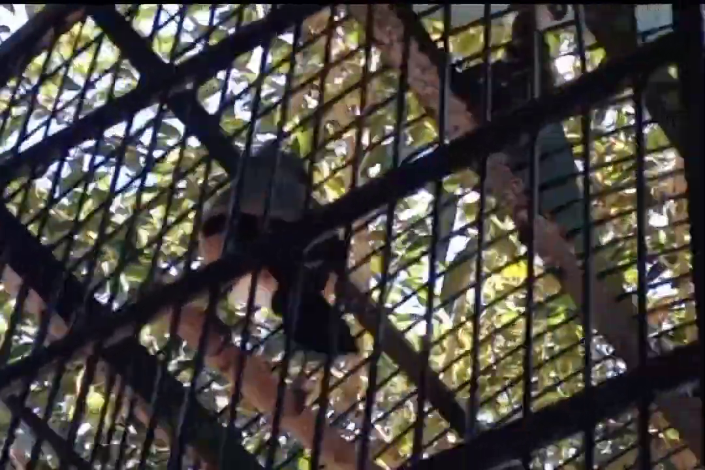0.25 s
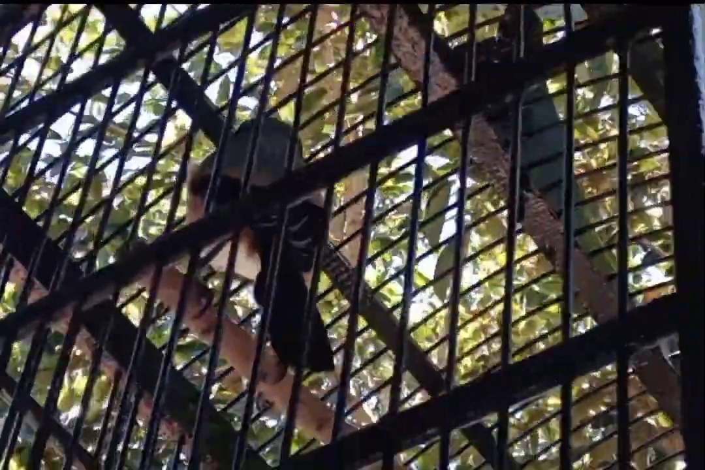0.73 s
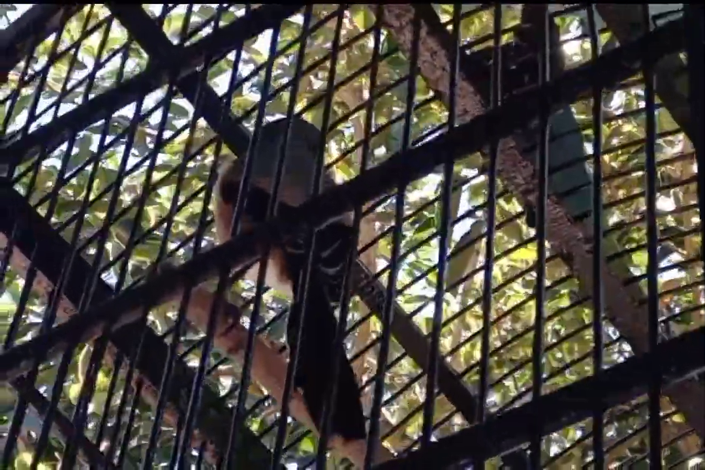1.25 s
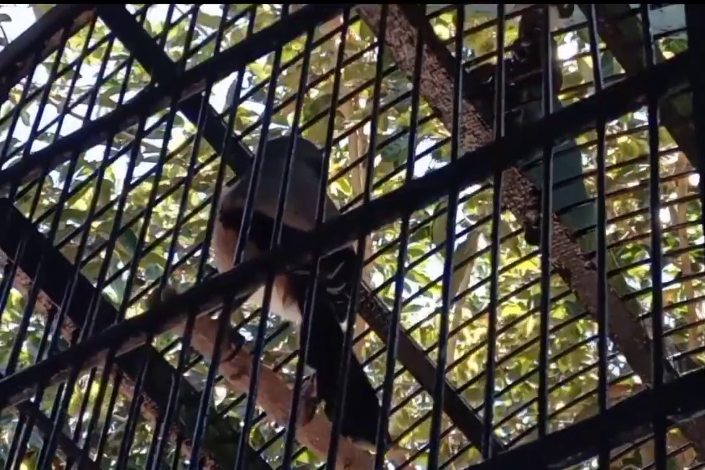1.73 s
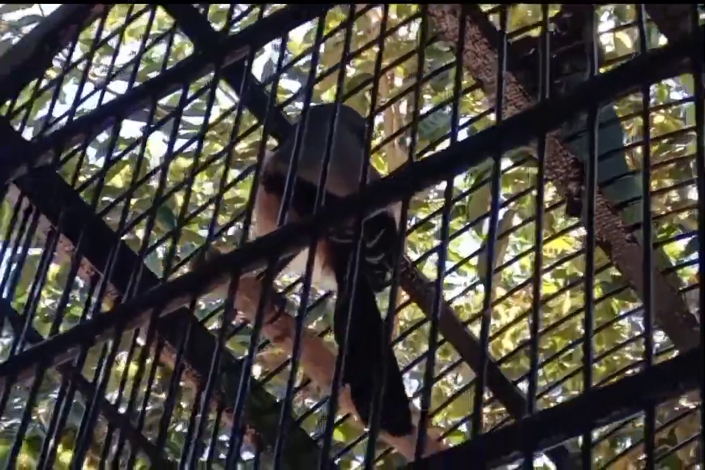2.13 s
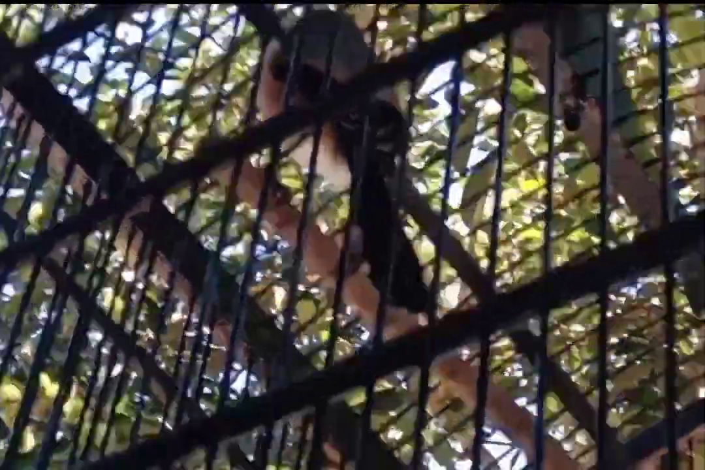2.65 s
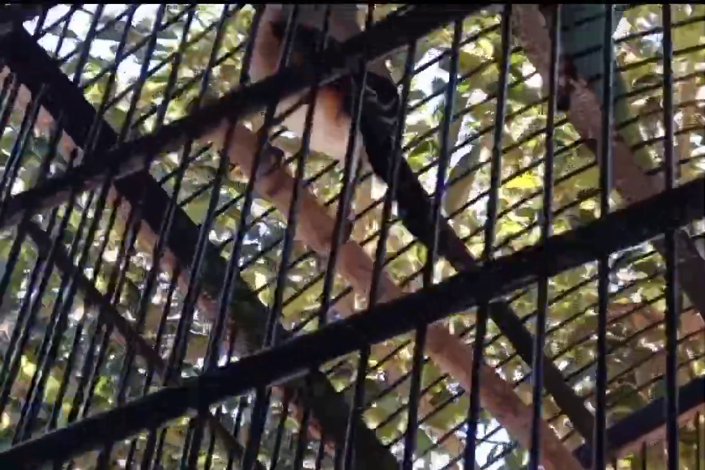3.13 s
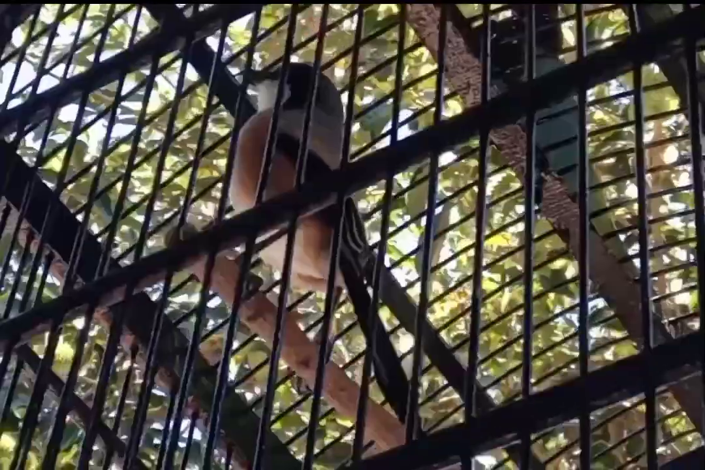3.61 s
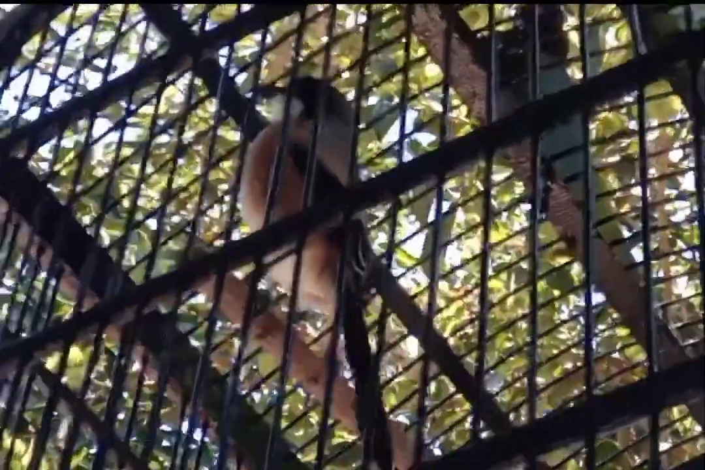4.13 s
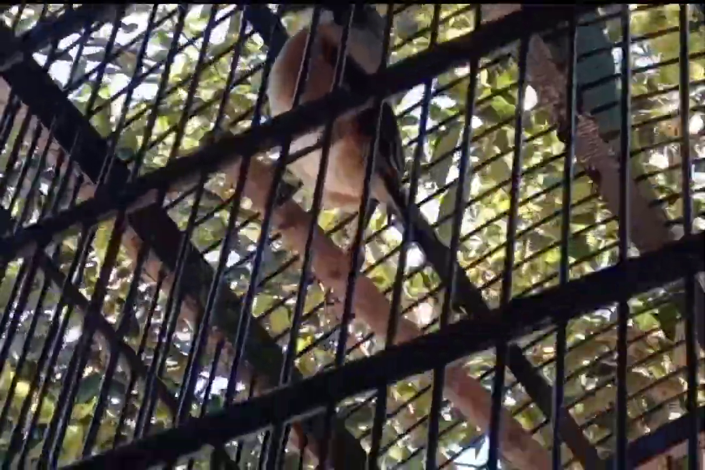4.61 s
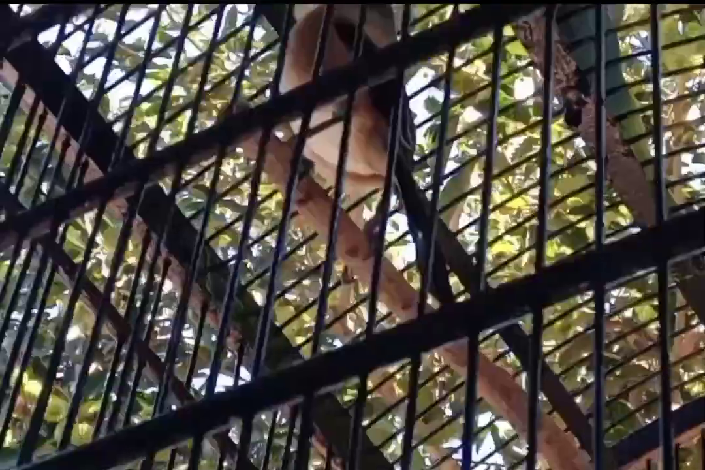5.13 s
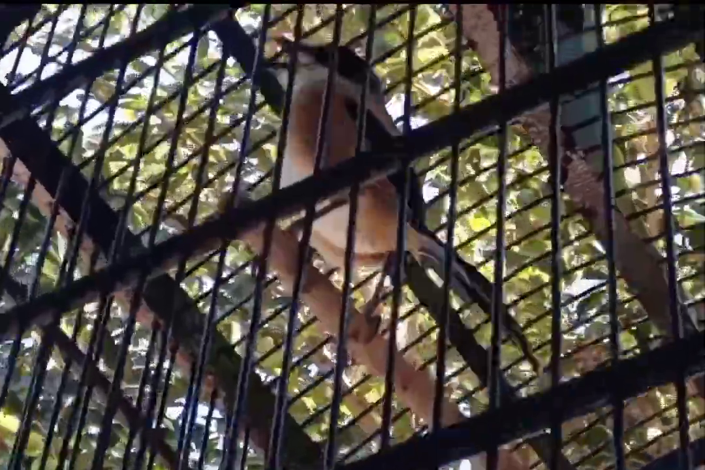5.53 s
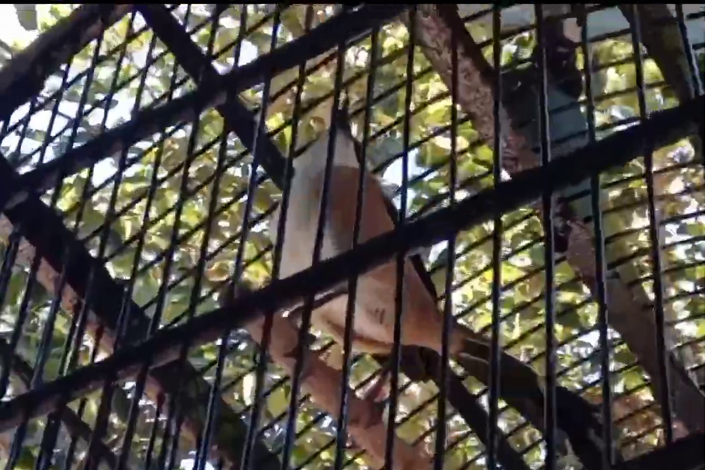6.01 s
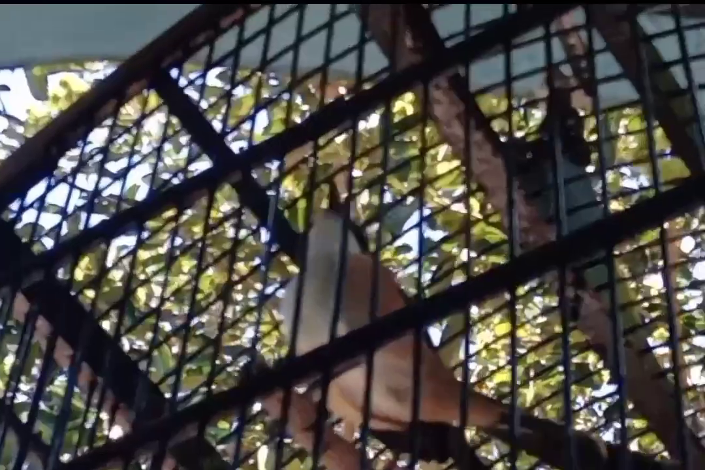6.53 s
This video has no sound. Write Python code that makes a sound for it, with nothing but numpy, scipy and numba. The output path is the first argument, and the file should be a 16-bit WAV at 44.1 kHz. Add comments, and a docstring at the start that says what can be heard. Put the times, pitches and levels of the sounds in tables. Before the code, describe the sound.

Outdoors in a walled yard, a caged bird sings close to a phone microphone, with a low single-cylinder motorbike idling at about 12 to 16 putts a second and soft street hiss. The tail of a rasp opens, then three rising double chirps at 0.15-0.4 s and falling whistles at 0.5 and 0.9. A harsh throbbing rasp lasts from 1.2 to 1.4, three chirps follow at 1.5-1.7, whistles at 1.9 and 2.7, with one faint chirp at 2.4. Rasp at 3.0, chirps at 3.3-3.55, whistle at 3.7, weak chirp at 4.0, rasp at 4.25. The engine stops at 4.3. Chirps at 4.5-4.7, whistles at 4.8 and 5.15; wood knocks between 5.1 and 5.65 overlap a rasp at 5.5. Two chirps at 5.75-5.9, wing swishes near 6.0-6.5, a strong whistle at 6.1, and broken short rasps from 6.5 to 6.7.

```python
"""A caged shrike sings close to a phone in a walled yard: harsh rasps of throbbing pulses and breath,
double rising chirps of two coupled voices, and falling whistles built from gliding sines.
A single-cylinder motorbike idles nearby as a train of ringing firings, then stops. Struck modes make wood
knocks, filtered noise makes wing swishes and street hiss, and faint gliding sines make the far calls.
The phone turns its gain down under the loud rasps and limits the peaks."""
import sys
import numpy as np
from scipy import signal
from scipy.fft import rfft, irfft, next_fast_len
from scipy.io import wavfile
from scipy.ndimage import uniform_filter1d, minimum_filter1d
from numba import njit

SR = 44100
rng = np.random.default_rng(int(sys.argv[2]) if len(sys.argv) > 2 else 0)


def gain_from_db(level_db):
    """Turn a decibel level (scalar or array-like) into a linear amplitude factor."""
    decades = np.asarray(level_db, float) / 20
    return 10 ** decades


def generate_wav(signal):
    """Clip the signal to [-1, 1] and save it as 16-bit WAV at the path in sys.argv[1]."""
    frames = np.transpose(np.atleast_2d(signal))
    scaled = np.clip(frames, -1, 1) * 32767
    pcm = np.round(scaled).astype(np.int16)
    wavfile.write(sys.argv[1], SR, pcm)


N = 298116
T = np.arange(N) / SR

# Level of the street hiss: (time [s], level [dB])
STREET_LEVEL = [(0, -27.5), (1, -29.5), (4.1, -30.5), (4.6, -40.5), (6.3, -33), (6.76, -35.5)]
# Colour of the street hiss: (frequency [Hz], relative density [dB per Hz])
STREET_COLOUR = [(210, -10.5), (350, 4.5), (392, -9.5), (575, -4), (755, -1.5), (858, -5), (1280, -5.5),
                 (1460, -8.5), (1910, -4), (3300, -12.5), (6670, -8), (8910, -27.5), (16100, -35)]
# Edges between the street bands that waver separately: (frequency [Hz])
STREET_BAND_EDGES = [600, 1200, 2200, 3800, 6000, 9000]
# Level of the low rumble, before it wavers: (time [s], level [dB])
RUMBLE_LEVEL = [(4.4, -40), (5.0, -35.5), (5.4, -41), (6.1, -31), (6.76, -43.5)]
# Far birds and squeaks: (time [s], length [s], start pitch [Hz], end pitch [Hz], level before blurring [dB])
FAR_CALLS = [(.17, 0.19, 1510, 1425, -26.5), (1.958, 0.12, 442, 380, -18), (2.133, .045, 14500, 14200, -36),
             (2.48, 0.047, 14500, 14300, -36), (2.563, 0.089, 733, 676, -26.5),
             (3.961, 0.042, 11600, 11100, -30), (3.967, 0.079, 10430, 10530, -23),
             (4.069, 0.031, 6670, 5900, -17), (4.16, 0.097, 1320, 1245, -31), (4.512, 0.21, 310, 310, -32),
             (6.061, 0.055, 7430, 7300, -11), (6.248, 0.29, 1276, 1220, -25)]
# Near surfaces of the yard: (delay [ms], level against the direct sound [dB])
NEAR_ECHOES = [(3.66, -3.5), (9.0, -13), (15.0, -24)]
# Scattered tail of the walls, by band: (centre [Hz], relative level [dB], decay by 60 dB [s])
WALL_BANDS = [(603, 17, 0.076), (1550, -2.5, 0.12), (2147, 7.5, 0.1), (2900, 4.5, 0.2), (4300, -10, 0.53),
              (7740, -4.5, 0.37), (10800, -6, 0.076)]
# Idling speed of the motorbike: (time [s], firing rate [firings per s])
IDLE_SPEED = [(0, 15.45), (.28, 16.22), (.88, 12.1), (1.13, 12.35), (1.48, 14.08), (2.28, 15.81),
              (2.78, 15.75), (3.28, 14.62), (3.88, 15.62), (4.18, 11.52)]
# Exhaust modes: (frequency [Hz], relative level [dB], decay by 60 dB [s])
EXHAUST_MODES = [(82.8, 4, 0.38), (128.7, 6.5, 0.16), (201.2, 1, 0.22), (309.3, -13, 1), (740.7, -12, 0.25)]
# Swishes of wings: (time [s], length [s], low air level [dB], feather hiss level [dB])
WING_SWISHES = [(1.122, 0.052, -62, -23.5), (2.072, 0.075, -35, -19), (5.995, 0.12, -26.5, -48),
                (6.036, 0.17, -30, -19), (6.269, 0.23, -24.5, -29.5)]
# Knocks on wood: (time [s], level [dB], hollow body against board [dB], crack against board [dB])
WOOD_KNOCKS = [(5.133, 7.5, -25, -8.5), (5.323, 5.5, -14, -9.5), (5.483, 18, -19.5, -7.5),
               (5.644, 11.5, -19, -13)]
# Modes of the struck board: (frequency [Hz], relative drive [dB], decay by 60 dB [s])
BOARD_MODES = [(739, -9, 0.021), (1082, -3.5, 0.049), (1578, -4, 0.12), (1936, 9, 0.039),
               (2130, -7.5, 0.13), (3260, -19, 0.068), (6600, -19, 0.034)]
# Modes of the hollow behind it: (frequency [Hz], relative drive [dB], decay by 60 dB [s])
HOLLOW_MODES = [(310, -3, 0.34), (378, 14, 0.059), (450, 29, 0.032), (820, -10, .08)]
# Rasps: (time [s], length [s], level before the throbs [dB], basic pulse rate [Hz],
#         throat brightness at start [dB per octave])
RASPS = [(-.05, .115, 8.5, 628, 1.5), (1.22, 0.21, 9.5, 601.2, 2.5), (3.036, 0.24, 7.5, 604, 4),
         (4.245, 0.2, 0, 571.3, 1.2), (5.47, .22, 9, 605.3, 3), (6.477, 0.01, 0.5, 883, -2),
         (6.492, .032, -4.5, 587, 0.5), (6.533, 0.035, -3, 395, -1), (6.636, 0.0073, 2.5, 900, 3.5),
         (6.642, 0.053, -1.5, 450, 3)]
# Throat colour before the brightness tilt: (frequency [Hz], relative density [dB per Hz])
THROAT_COLOUR = [(710, -90), (1200, -37.5), (1350, -57), (1660, -19), (1980, -30.5), (2210, -21.5),
                 (2620, -32.5), (3300, -12), (3950, -9.5), (5090, 0.5), (5990, -10), (7130, -7.5),
                 (8500, -29.5), (10500, -29.5), (13400, -44.5), (15100, -28.5), (16100, -38)]
# Falling whistles: (time [s], length [s], start pitch [Hz], end pitch [Hz], level [dB])
WHISTLES = [(0.492, 0.17, 2398, 1342, 1.5), (0.886, 0.16, 2304, 1300, 4.5), (1.927, 0.18, 2460, 1264, 3),
            (2.67, 0.16, 2358, 1242, 2), (3.712, 0.18, 2398, 1279, 4.5), (4.82, 0.16, 2440, 1235, 0.5),
            (5.164, 0.16, 2214, 1280, 2.5), (6.111, 0.17, 2453, 1292, 6.5)]
# Share of a whistle's drop reached after one and two thirds of its length: (share [0 to 1])
WHISTLE_FALL = [.27, .6]
# Multiples 2 to 8 of a whistle, before the treble colour: (level against the fundamental [dB])
WHISTLE_OVERTONES = [-18.5, -33, -39, -53, -47, -49, -48]
# Treble colour of the whistles: (frequency [Hz], relative gain [dB])
WHISTLE_TREBLE = [(3000, 3.7), (5200, -13), (6600, 8.5), (7600, -6), (8600, -32), (12500, -14), (14800, -4),
                  (16100, -7)]
# Double chirps, one voice from each side of the syrinx: (time [s], upper voice level [dB],
#         upper voice top pitch [Hz], lower voice lag [ms], lower voice level [dB])
CHIRPS = [(0.147, 5.5, 3380, 8.7, 2.5), (0.248, -1, 3160, 12, 1.5), (0.35, -6.5, 3150, 9, -0.5),
          (1.498, 3, 3180, 12, 4.5), (1.6, -0.5, 3190, 7.6, 2.5), (1.705, 1, 3080, 12.4, 3.5),
          (2.378, -12, 2900, 11, -2), (3.328, 4, 3330, 14.3, 3), (3.423, 0.5, 3170, 11.8, 3),
          (3.53, -1, 3260, 12, 2.5), (4.032, -6.5, 3060, 16, 1), (4.478, 2, 3135, 13, 0),
          (4.574, -3, 3190, 13.4, -1.5), (4.676, -2.5, 2900, 15.2, -5.5), (5.753, 5.5, 3420, 8.8, 1),
          (5.857, 4.5, 3507, 6.8, 2.5)]
# Square and cube of the two chirp voices together: (level [dB])
VOICE_COUPLING = [-13, -32.5]


def colour(x, points):
    """Filter by (frequency [Hz], gain [dB]) points, then bring the rms to 1."""
    hz, db = np.transpose(points)
    size = next_fast_len(N)
    bins_hz = np.arange(size // 2 + 1) * SR / size
    gain = gain_from_db(np.interp(np.log(bins_hz + 1), np.log(hz), db))
    y = irfft(rfft(x, size) * gain, size)[:N]
    return y / np.std(y)


def curve(points):
    """Rows (time [s], value) joined by straight lines."""
    return np.interp(T, *np.transpose(points))


def walk(rate):
    """Random levels held 1 / rate s and slewed twice; spread near 1."""
    hold = int(SR / rate)
    steps = np.repeat(rng.standard_normal(N // hold + 1), hold)
    return 1.3 * uniform_filter1d(uniform_filter1d(steps, hold), hold)[:N]


def gate(start, length, rise, fall):
    """Smooth on and off of one sound, all in s."""
    opening = np.clip((T - start) / rise, 0, 1)
    closing = np.clip((start + length - T) / fall, 0, 1)
    return np.sin(np.pi / 2 * opening * closing) ** 2


def ring(x, modes):
    """Excite decaying resonances (frequency [Hz], drive [dB], decay by 60 dB [s])."""
    out = 0
    for hz, db, t60 in modes:
        pole = np.exp(2j * np.pi * hz / SR - np.log(1000) / (t60 * SR))
        out = out + gain_from_db(db) * signal.lfilter([1], [1, -pole], x).imag
    return out


def add_note(out, start, length, path_hz, db, rise, fall, overtones_db):
    """A sine with overtones, gliding smoothly through path_hz; rise and fall are shares of its length."""
    u = np.linspace(0, 1, int(length * SR))
    glide = np.polyfit(np.linspace(0, 1, len(path_hz)), path_hz, len(path_hz) - 1)
    phase = 2 * np.pi * (np.cumsum(np.polyval(glide, u)) / SR + rng.random())
    wave = np.sin(phase)
    for multiple, overtone_db in enumerate(overtones_db, 2):
        wave = wave + gain_from_db(overtone_db) * np.sin(multiple * phase)
    shape = np.sin(np.pi / 2 * np.clip(u / rise, 0, 1) * np.clip((1 - u) / fall, 0, 1)) ** 2
    i = int(start * SR)
    out[i:i + len(u)] += gain_from_db(db) * shape * wave


@njit
def follow(x, attack, release):
    """Envelope that rises fast and sinks slowly."""
    y, e = np.empty(len(x)), x[:400].mean()
    for i in range(len(x)):
        e += (x[i] - e) * (attack if x[i] > e else release)
        y[i] = e
    return y


def street():
    """Distant traffic and leaves as noise, each band wavering by itself, over a low rumble."""
    hiss = colour(rng.standard_normal(N), STREET_COLOUR)
    lows = [signal.sosfiltfilt(signal.butter(1, hz, fs=SR, output="sos"), hiss) for hz in STREET_BAND_EDGES]
    bands = np.diff([0 * hiss, *lows, hiss], axis=0)
    wavering = sum(gain_from_db(2.2 * walk(14)) * band for band in bands)
    rumble = colour(rng.standard_normal(N), [(40, -45), (90, -11), (200, -26), (400, -28.0), (800, -52)])
    return gain_from_db(curve(STREET_LEVEL)) * wavering + gain_from_db(curve(RUMBLE_LEVEL) + 2 * walk(12)) * rumble


def far_calls():
    """Gliding sines whose strength wanders, as distance blurs the calls."""
    calls = np.zeros(N)
    for start, length, start_hz, end_hz, db in FAR_CALLS:
        add_note(calls, start, length, [start_hz, end_hz], db, .2, .5, [])
    return calls * gain_from_db(5 * walk(60))


def yard(x):
    """A few near echoes comb the sound; the walls add scattered echoes, each band dying at its own pace."""
    tail_db = -5  # energy of the whole tail against the direct sound
    t = T[:SR // 2]
    centres_hz = np.transpose(WALL_BANDS)[0]
    scatter = rng.standard_normal(N) * gain_from_db(5.1 * rng.standard_normal(N))
    tail = np.zeros(len(t))
    for hz, db, t60 in WALL_BANDS:
        band = colour(scatter, np.c_[centres_hz, np.where(centres_hz == hz, 0, -30)])[:len(t)]
        tail += gain_from_db(db) * band * np.exp(-np.log(1000) * t / t60)
    tail = tail * np.clip(t / 0.0009, 0, 1)
    response = gain_from_db(tail_db) * tail / np.sqrt(np.sum(tail ** 2))
    response[0] = 1  # direct sound
    for ms, db in NEAR_ECHOES:
        # sinc places the echo between samples
        response += gain_from_db(db) * np.sinc(t * SR - ms * SR / 1000)
    return signal.fftconvolve(x, response)[:N]


def motorbike():
    """Each firing, uneven in strength, rings the exhaust modes until the valve shuts; then the engine stops."""
    idle_db, extra_db, extra_until_s, stops_s = -12, 3, 1, 4.3  # the idle starts louder
    count = 0.29 + np.cumsum(curve(IDLE_SPEED)) / SR  # starts partway through a cycle
    level_db = idle_db + extra_db * np.clip((extra_until_s - T) / 0.083, 0, 1)
    level_db = level_db + 2.0 * rng.standard_normal(N)
    firings = np.diff(np.floor(count), prepend=0) * gain_from_db(level_db) * (T < stops_s)
    t = T[:SR // 10]
    pipe = 0
    for hz, db, t60 in EXHAUST_MODES:
        pipe = pipe + gain_from_db(db) * np.exp(-np.log(1000) * t / t60) * np.sin(2 * np.pi * hz * t)
    # the valve swells the ring for 47 ms; a weaker ring remains
    pipe = pipe * (0.28 + gate(0, 0.0469, 0.0082, 0.0039)[:len(t)])
    return signal.fftconvolve(firings, pipe / np.abs(pipe).max())[:N]


def swishes():
    """Pushed air below, feather hiss above, both fluttering."""
    air = colour(rng.standard_normal(N), [(150, -11), (350, 1), (600, 0.5), (1200, -12.5),
                                          (2500, -8.5), (5000, -59.0)])
    hiss = colour(rng.standard_normal(N), [(1500, -24.5), (4000, -4.5), (7000, 5), (9000, -19.0),
                                           (12000, -17.5), (15000, -20.5), (16500, -22)])
    out = np.zeros(N)
    for start, length, air_db, hiss_db in WING_SWISHES:
        stroke = gate(start, length, 0.092 * length, .5 * length)
        out += stroke * (gain_from_db(air_db) * air + gain_from_db(hiss_db) * hiss)
    return out * gain_from_db(3 * walk(60))


def knocks():
    """A sharp blow rings the board and cracks; the hollow behind it answers a moment later."""
    out = np.zeros(N)
    hiss = colour(rng.standard_normal(N), [(600, -13.5), (1500, 5.0), (6000, -31.5), (10000, -1),
                                           (12800, -23), (15000, -2.5), (16500, -24.5)])
    for start, db, hollow_db, crack_db in WOOD_KNOCKS:
        blow = rng.standard_normal(N) * gate(start, 0.0019, 0.0014, 0.0046)
        board = np.gradient(ring(blow, BOARD_MODES))
        push = np.gradient(np.gradient(gate(start + .007, .003, .0015, .0015)))
        hollow = ring(push, HOLLOW_MODES)
        crack = hiss * (T > start) * np.exp(-np.abs(T - start) / 0.0054)
        knock = board / np.abs(board).max() + gain_from_db(hollow_db) * hollow / np.abs(hollow).max()
        out += gain_from_db(db) * (knock + gain_from_db(crack_db) * crack)
    return out


def notes():
    """Whistles that fade as they sink, and two-voiced chirps that rise fast, level off and intermodulate."""
    whistles, chirps = np.zeros((2, N))
    for start, length, start_hz, end_hz, db in WHISTLES:
        path_hz = [start_hz, *(start_hz + share * (end_hz - start_hz) for share in WHISTLE_FALL), end_hz]
        add_note(whistles, start, length, path_hz, db, .2, .45, WHISTLE_OVERTONES)
    whistles = np.std(whistles) * colour(whistles, WHISTLE_TREBLE)

    upper_hz, upper_s = 2195, 0.034  # start pitch and length of the upper voice
    lower_hz, lower_top_hz, lower_s = 1658, 2932, 0.038
    lower_path = [lower_hz, 0.46 * lower_hz + 0.54 * lower_top_hz,
                  0.051 * lower_hz + .92 * lower_top_hz, lower_top_hz]
    for start, upper_db, upper_top_hz, lag_ms, lower_db in CHIRPS:
        upper_path = [upper_hz, 0.23 * upper_hz + 0.78 * upper_top_hz, upper_top_hz]
        add_note(chirps, start, upper_s, upper_path, upper_db, .2, .4, [])
        add_note(chirps, start + lag_ms / 1000, lower_s, lower_path, lower_db, .18, .5, [])
    chirps *= gain_from_db(2.5 * walk(350))
    # both voices share one windpipe: sum tones and scratchy breath appear above them
    extra = sum(gain_from_db(db) * chirps ** power for power, db in enumerate(VOICE_COUPLING, 2))
    extra = extra + gain_from_db(-37) * chirps ** 2 * rng.standard_normal(N)
    above = signal.butter(4, [3600, 15500], "band", fs=SR, output="sos")
    return whistles + chirps + signal.sosfilt(above, extra)


def rasps():
    """Unsteady syrinx pulses and breath through the throat, in deepening throbs that each take a new pitch."""
    throb_hz, throb_db, deepens_db = 46, 6, 6
    dulling_db = -5  # brightness change [dB per octave per s]
    line_hz, line_db = 1650, -32.5  # faint wandering tone in the longer rasps
    out = 0
    hz, db = np.transpose(THROAT_COLOUR)
    drift = .2 * walk(12)
    steps = np.exp(.15 * rng.standard_normal((len(RASPS), 16)))
    jitter = np.exp(.06 * walk(400))
    grain_db = 0.5 * walk(150)
    # the windpipe spreads each pulse over a short sweep
    smear = np.cos(np.pi * np.arange(64) ** 2 / 128) / 6
    for (start, length, level_db, rate, bright_db), step in zip(RASPS, steps):
        throb = throb_hz * (T - start) + drift + .15
        beat = -np.cos(2 * np.pi * throb)
        pitch = jitter * step[np.clip(throb, 0, 15).astype(int)]
        # the pulses are fastest around the start
        rate_now = rate * pitch * np.exp(.45 * np.exp(-np.abs(T - start) / 0.013))
        pulses = np.diff(np.floor(np.cumsum(rate_now) / SR), prepend=0)
        source = np.convolve(pulses, smear)[:N] / np.std(pulses) + .6 * rng.standard_normal(N)

        tilts_db = bright_db, bright_db + dulling_db * length
        first, last = (colour(source, np.c_[hz, db + tilt * np.log2(hz / 5000)]) for tilt in tilts_db)
        progress = np.clip((T - start) / length, 0, 1)
        voice = (1 - progress) * first + progress * last
        depth_db = throb_db + deepens_db * progress
        swell = gain_from_db(depth_db * beat - deepens_db * progress / 2 + grain_db)
        line = np.sin(2 * np.pi * np.cumsum(line_hz * (1 + 0.054 * walk(30))) / SR)
        voice += gain_from_db(line_db) * (length > .09) * swell * line
        shape = gate(start - .003, length * 1.1, .011, .2 * length)
        out = out + gain_from_db(level_db) * voice * shape * swell
    return out


def scene():
    """Bird and knocks echo in the yard, over wing swishes, motorbike, street and far calls."""
    background = street() + far_calls() + motorbike()
    echoing = yard(knocks() + notes() + rasps())
    return (background + swishes() + echoing)[None]


def top_cut(x):
    """Nothing passes above the cut-off."""
    return signal.sosfilt(signal.butter(12, 16260, fs=SR, output="sos"), x)


def record(dry):
    """Bass cut; gain control holds loud calls down and recovers slowly; a quick limiter flattens the peaks."""
    x = signal.sosfilt(signal.butter(2, 55, "high", fs=SR, output="sos"), dry[0])
    # gain control: 1.8 ms attack, 0.3 s release, acts above -7 dB
    loudness = follow(np.abs(x), 1 / (0.0018 * SR), 1 / (.3 * SR))
    x = x * np.minimum(1, (gain_from_db(-7.0) / (loudness + 1e-9)) ** 0.48)
    # limiter: looks around each peak, 4 ms release
    peak = -minimum_filter1d(-np.abs(x), size=41)
    x = x / np.maximum(1, uniform_filter1d(follow(peak, 1., 1 / (.004 * SR)), size=21))
    x = np.clip(x * gain_from_db(0.96), -1, 1)  # driven 0.96 dB into clipping
    x = signal.sosfilt(signal.ellip(8, .2, 60, 16100, fs=SR, output="sos"), x)  # treble ends at 16.1 kHz
    return top_cut(x[None])


dry = scene()
out = record(dry)
generate_wav(out)
```